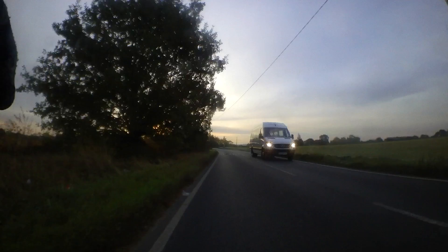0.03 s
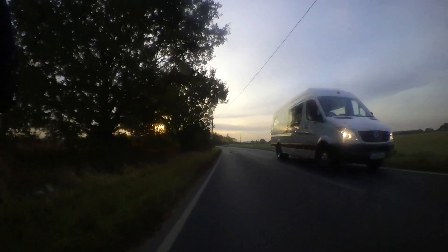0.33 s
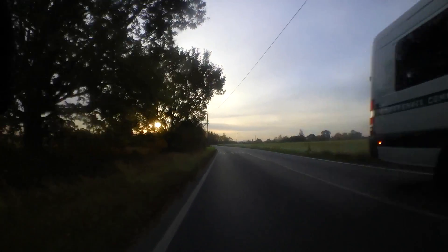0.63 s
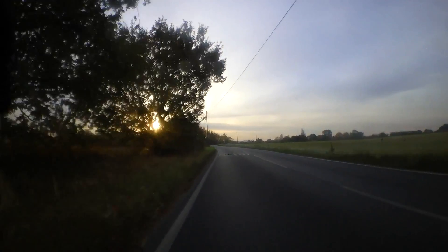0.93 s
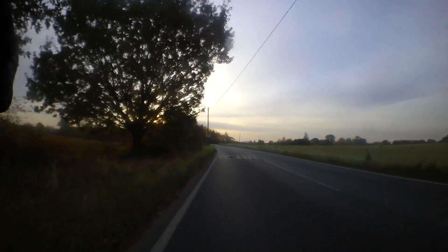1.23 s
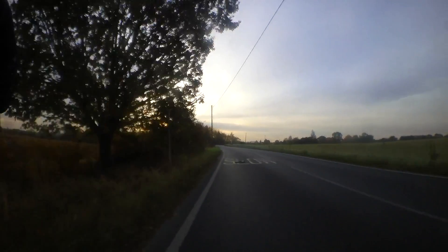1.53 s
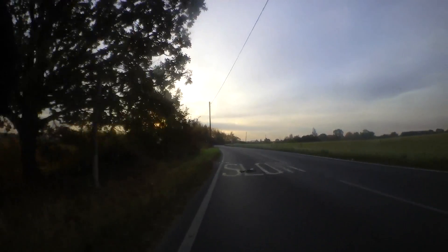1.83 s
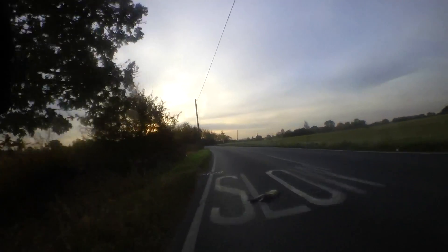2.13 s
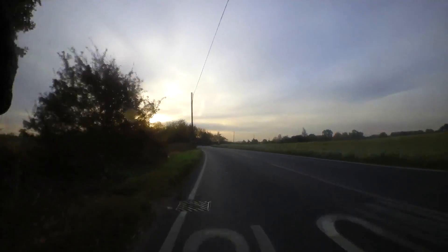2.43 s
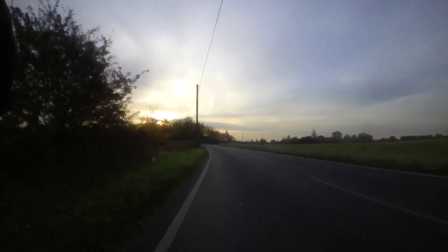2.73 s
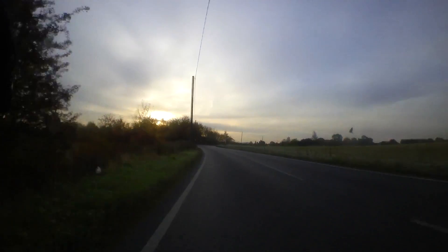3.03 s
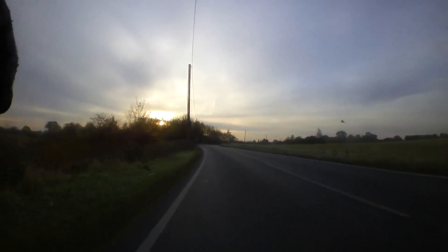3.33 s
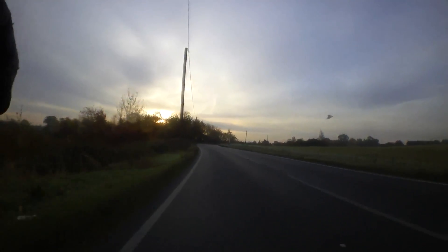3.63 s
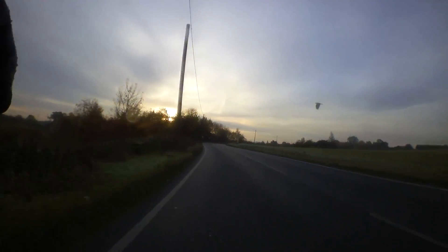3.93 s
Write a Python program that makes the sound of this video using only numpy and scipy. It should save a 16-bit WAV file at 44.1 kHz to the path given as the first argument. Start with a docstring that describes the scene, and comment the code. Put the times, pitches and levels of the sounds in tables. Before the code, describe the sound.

Wind rushes and buffets the microphone on a bicycle riding along a country road, while its plastic mount rattles with short, bright clicks. Early on, an oncoming van's tyres hiss past, then the bicycle's tyres briefly hum.

```python
"""A camera rides on a bicycle along a country road. The sound cuts in on wind buffeting its two
microphone ports, hardest in the first half second. From the start, rough asphalt shakes the plastic
mount, which rattles with short, bright clicks; hard bumps snap the case. At 0.8 s an oncoming van's
tyres hiss by and its wake brings a few gusts. The bicycle's tyres hum loudest near 1.5 s;
headwind and rattle carry on to the end, with a few lighter gusts."""
import sys
import numpy as np
from scipy import signal
from scipy.fft import rfft, irfft
from scipy.io import wavfile

SR = 44100
rng = np.random.default_rng(int(sys.argv[2]) if len(sys.argv) > 2 else 0)


def log_audio(samples):
    """Write samples as a 16-bit WAV file to the path given in sys.argv[1]."""
    # one column per channel
    frames = np.atleast_2d(samples).T
    # limit to full scale, then quantise
    limited = np.clip(frames, -1, 1)
    pcm = np.round(limited * 32767).astype(np.int16)
    wavfile.write(sys.argv[1], SR, pcm)


N = 176400


def amp(db):
    """Decibels to gain."""
    return 10 ** (np.asarray(db) / 20)


def unit_rms(x):
    """Scale to rms 1."""
    return x / np.sqrt(np.mean(x ** 2) + 1e-20)


def at_hz(points, hz):
    """Interpolate a table on a log-frequency axis."""
    f, value = np.transpose(points)
    return np.interp(np.log(hz + 1), np.log(f + 1), value)


def curve(points):
    """Interpolate a time table at every sample."""
    return np.interp(np.arange(N) / SR, *np.transpose(points))


def add(mix, start_s, sound):
    """Mix in a stereo sound at start_s."""
    part = mix[:, max(round(start_s * SR), 0):][:, :sound.shape[1]]
    part += sound[:, :part.shape[1]]


def pan(db):
    """Port gains for a left-minus-right level."""
    return amp([[db / 2], [-db / 2]])


def coloured(x, spectrum):
    """Filter x by a spectrum; rms 1."""
    size = x.shape[-1]
    gain = amp(at_hz(spectrum, np.fft.rfftfreq(size, 1 / SR)))
    return unit_rms(irfft(rfft(x) * gain, size))


def wander(cutoff_hz, channels=1):
    """Smooth random motion from 3 Hz to the cutoff; rms 1."""
    hz = np.fft.rfftfreq(N, 1 / SR)
    white = rfft(rng.standard_normal((channels, N)))
    return unit_rms(irfft(white * (hz > 3) / (1 + (hz / cutoff_hz) ** 4), N))


def port_noise(spectrum):
    """Noise at the two ports, partly alike below 5 kHz, unrelated above."""
    # likeness of the ports (frequency [Hz], correlation [0-1])
    likeness = [(25,0.8),(60,0.1),(155,0.92),(300,0.62),(600,0.41),(1500,0.5),(3000,0.68),(5000,0)]
    left, other = rfft(rng.standard_normal((2, N)))
    same = at_hz(likeness, np.fft.rfftfreq(N, 1 / SR))
    right = same * left + np.sqrt(1 - same ** 2) * other
    return coloured(irfft(np.array([left, right]), N), spectrum)


def airflow(spectrum, eddy_db, eddy_hz, port_db):
    """One band of wind: eddies swell it at both ports, smaller ones at each alone; rms 1."""
    eddies = amp(eddy_db * wander(eddy_hz) + port_db * wander(2 * eddy_hz, channels=2))
    return unit_rms(port_noise(spectrum) * eddies)


def headwind():
    """Oncoming air rushes over the ports."""
    # rush spectrum (frequency [Hz], density [dB])
    spectrum = [(25,-23.5),(60,-10),(110,-3),(165,3),(225,-0.5),(280,3),(370,0),(430,-4),(490,0.5),(750,-4),(1000,-9.5),(1400,-14.5),(2100,-18.5),(2800,-23),(4500,-18.5),(7000,-39),(16000,-75)]
    # wind strength (time [s], level [dB])
    levels = [(.35,-48.5),(.55,-43.5),(1.05,-44),(1.45,-42.5),(1.9,-41.5),(2.0,-45.5),(2.3,-47),(2.55,-43),(2.73,-41),(2.98,-44),(3.17,-40.5),(3.26,-38),(3.37,-38),(3.44,-44.5),(3.6,-39.5),(3.72,-43.5),(3.79,-37.5),(3.88,-46.5),(4,-42)]
    return airflow(spectrum, eddy_db=1.4, eddy_hz=19, port_db=1.4) * amp(curve(levels))


def gusts():
    """Each gust buffets the ports with a low thump and a hiss that swell and fall."""
    # gusts (peak time [s], nominal half width [s], relative thump [dB], relative hiss [dB])
    events = [(0.103,0.051,-25,-35.5),(0.197,0.06,-25.5,-39),(0.323,0.039,-25,-37.5),(0.427,0.033,-29,-39.5),(0.512,0.037,-71,-39.5),(0.869,0.035,-68,-41.5),(0.923,0.028,-36.5,-42),(1.133,0.024,-46.5,-44),(2.574,0.032,-46.5,-49.5),(2.738,0.024,-37,-50.5),(3.297,0.017,-39,-46),(3.367,0.0063,-46,-41.5)]
    # low buffeting (frequency [Hz], density [dB])
    thump_spectrum = [(25,-26),(65,-16),(105,-20.5),(140,-6),(162,7),(190,-6),(215,-3),(240,-5.5),(285,-2.5),(400,-14.5),(750,-13.5),(1000,-36),(3000,-87)]
    # turbulent hiss (frequency [Hz], density [dB])
    hiss_spectrum = [(300,-20),(880,-1),(1080,8.5),(1500,4),(2100,-1),(2700,-10.5),(4000,-9),(5000,-15),(6500,-27),(9000,-50),(16000,-72)]
    peak_s, half_s, thump_db, hiss_db = np.transpose(events)[:, :, None]
    swell = np.exp(-((np.arange(N) / SR - peak_s) / half_s) ** 2 / 1.4)
    thump_gain = np.linalg.norm(swell * amp(thump_db - 1.5), axis=0)  # gusts add in power
    hiss_gain = np.linalg.norm(swell * amp(hiss_db + 1.5), axis=0)
    thump = port_noise(thump_spectrum) * thump_gain
    hiss = airflow(hiss_spectrum, eddy_db=1.2, eddy_hz=59.5, port_db=3) * hiss_gain
    return thump + hiss * pan(db=3)


def crunch(t, spectrum):
    """Two surfaces meet: a noise burst with a faint trailing fizz; rms 1."""
    peak_s, fizz_s, fizz_db = .0006, .002, -16
    u = t / peak_s
    impact = (u * np.exp(1 - u)) ** 2
    fizz = amp(fizz_db) * np.exp(-t / fizz_s) * (1 - np.exp(-u ** 2))
    noise = coloured(rng.standard_normal((2, len(t))), spectrum)
    return unit_rms(noise * (impact + fizz))


def mount_click(crunch_db):
    """One strike of the mount's joint: a crunch and a short ring, different each time."""
    # mount modes (frequency [Hz], t60 [s], left weight [dB], right weight [dB], right lead [rad])
    modes = [(3870,0.038,-11,-29,0.47),(4246,0.049,-12,-4.5,1.27),(4757,0.013,0,-4,2.54),(5004,0.04,2.5,10,2.22),(5366,0.025,-9,-8.5,0.95)]
    # contact spectrum (frequency [Hz], density [dB])
    contact = [(300,-18),(2100,9.5),(3000,1.5),(5000,11),(6300,-1),(7200,-4),(8300,-0.5),(9400,4),(10200,-9.5),(11300,2.5),(12700,-16.5),(15000,-14),(16500,-17)]
    rise_s, strike_s, tail_db = .001, .0019, -13
    detune_spread, mode_spread_db, lead_spread_rad = .022, 2, .48
    t = np.arange(1100) / SR
    hz, t60_s, left_db, right_db, lead_rad = np.transpose(modes)[:, :, None]
    detune, strength, scatter = rng.standard_normal((3, len(modes), 1))
    phase = 2 * np.pi * (hz * (1 + detune_spread * detune) * t + rng.random((len(modes), 1)))
    rise = 1 - np.exp(-(t / rise_s) ** 2)
    strike = rise * (np.exp(-(t / strike_s) ** 2) + amp(tail_db))
    envelope = amp(mode_spread_db * strength - 60 * t / t60_s) * strike
    left = (envelope * amp(left_db) * np.sin(phase)).sum(0)
    right = (envelope * amp(right_db) * np.sin(phase + lead_rad + lead_spread_rad * scatter)).sum(0)
    ring = np.array([unit_rms(left), unit_rms(right)])
    click = ring + amp(crunch_db) * crunch(t, contact)
    return click * pan(db=rng.normal(-1.5, 2.5))


def mount_chatter():
    """Rough asphalt shakes the mount: light ticks that swell in clusters, the lightest dullest."""
    # shaking strength (time [s], relative level [dB])
    shake = [(.1,-32),(.37,-55),(.52,-39.5),(.64,-45.5),(.85,-42.5),(.98,-50),(1.08,-35),(1.15,-48),(1.25,-41.5),(1.9,-41.5),(2.0,-42.5),(2.33,-43.5),(2.6,-42.5),(2.82,-41.5),(3.02,-45.5),(3.25,-35.5),(3.44,-49),(3.55,-40),(4,-40.5)]
    ticks_per_s, spread_db, cluster_hz, cluster_db = 170, 6.5, 45, 3
    clusters = np.minimum(wander(cluster_hz)[0], 1)
    level_db = curve(shake) - 10 + cluster_db * clusters
    out = np.zeros((2, N))
    for sample in rng.integers(0, N, int(ticks_per_s * N / SR)):
        force = min(rng.standard_normal(), 1)
        tick = mount_click(crunch_db=-15 + 3 * force)
        add(out, sample / SR, tick * amp(level_db[sample] + spread_db * force))
    return out


def mount_knocks():
    """Bumps knock the mount's joint hard."""
    # knocks (time [s], relative level [dB])
    knocks = [(0.088, -23), (0.1021, -18), (0.1255, -24), (0.1897, -18), (0.2346, -20.5), (0.338, -16.5),
              (0.4932, -29.5), (0.5611, -27), (0.7002, -33.5), (0.7536, -31), (0.7763, -21.5),
              (0.8432, -28.5), (0.8835, -28), (1.0673, -26.5), (1.0772, -33), (1.0889, -23),
              (1.2019, -24.5), (1.2209, -21.5), (1.2508, -22), (1.2709, -25), (1.3267, -27), (1.3507, -23),
              (1.3759, -28.5), (1.4632, -22.5), (1.489, -23), (1.5676, -28), (1.6447, -27), (1.6841, -28),
              (1.7061, -27), (1.7919, -25.5), (1.915, -30), (1.9375, -21), (2.0477, -45), (2.0801, -27),
              (2.0904, -24), (2.134, -24), (2.2303, -25), (2.2832, -31.5), (2.309, -33.5), (2.3573, -31.5),
              (2.4079, -26), (2.4145, -25), (2.4735, -33), (2.4847, -30), (2.5581, -31), (2.6773, -20.5),
              (2.7082, -24.5), (2.7278, -21), (2.7679, -25), (2.7836, -17), (2.794, -26), (2.826, -27.5),
              (2.8521, -26.5), (2.8599, -24.5), (2.8954, -27), (2.8989, -23), (2.9662, -25),
              (2.9851, -25.5), (3.0733, -23), (3.0919, -16.5), (3.1712, -48), (3.2171, -36),
              (3.2345, -23.5), (3.2583, -21.5), (3.3941, -23.5), (3.4001, -22), (3.4854, -19),
              (3.5193, -34), (3.5331, -24), (3.5429, -21), (3.5469, -22), (3.5903, -31.5), (3.6511, -25.5),
              (3.6684, -27.5), (3.6891, -27.5), (3.7811, -20), (3.7971, -19.5), (3.8265, -26.5),
              (3.895, -29), (3.9345, -27)]
    out = np.zeros((2, N))
    for time_s, level_db in knocks:
        add(out, time_s, mount_click(crunch_db=-13.5) * amp(level_db - 14))
    return out


def case_snaps():
    """Hard bumps snap the case against the camera, near the right port."""
    # snaps (time [s], relative level [dB])
    snaps = [(0.1017, -26), (0.2339, -16.5), (0.774, -35), (1.465, -37), (1.7897, -33), (1.936, -33),
             (2.1335, -29.5), (2.676, -34), (3.399, -38), (3.7982, -30)]
    # snap spectrum (frequency [Hz], density [dB])
    spectrum = [(1000,-11),(5000,-9),(7500,-20),(10000,-7),(12500,-15),(14400,1),(16200,-3),(17000,-15)]
    t = np.arange(600) / SR
    out = np.zeros((2, N))
    for time_s, level_db in snaps:
        add(out, time_s, crunch(t, spectrum) * amp(level_db - 17) * pan(db=-9))
    return out


def van():
    """The passing van's tyre hiss rises and falls as 1 / distance."""
    # tyre hiss (frequency [Hz], density [dB])
    spectrum = [(80,-7),(200,-11),(1200,-2.5),(2500,-2.5),(3500,-5),(4900,1),(6000,-10.5),(7500,-35),(8900,-11),(11000,-35),(17000,-49)]
    pass_s, closing_m_per_s, gap_m, peak_db = .796, 29.7, 2.8, -46.5
    distance_m = np.hypot(gap_m, closing_m_per_s * (np.arange(N) / SR - pass_s))
    return port_noise(spectrum) * amp(peak_db) * gap_m / distance_m


def bicycle_tyres():
    """The tyres hum hollowly, louder on coarse asphalt."""
    # hum spectrum (frequency [Hz], density [dB])
    spectrum = [(380,-35),(540,-8),(640,0),(710,-3),(900,-30),(3000,-100)]
    # hum strength (time [s], level [dB])
    levels = [(1.1,-57),(1.45,-45.5),(1.9,-52),(2.3,-58),(3.7,-53.5)]
    return port_noise(spectrum) * amp(curve(levels))


def scene():
    """Sum of wind, rattle, van and tyres at the two ports."""
    return headwind() + gusts() + mount_chatter() + mount_knocks() + case_snaps() + van() + bicycle_tyres()


def record(dry):
    """Abrupt cut-in, then a low-pass."""
    start_s, ramp_s, cutoff_hz = .058, .002, 16500
    gate = np.clip((np.arange(N) / SR - start_s) / ramp_s, 0, 1)
    lowpass = signal.firwin(255, cutoff_hz, window=("kaiser", 9), fs=SR)
    return signal.oaconvolve(dry * gate, lowpass[None], "same")


dry = scene()
out = record(dry)
log_audio(out)
```